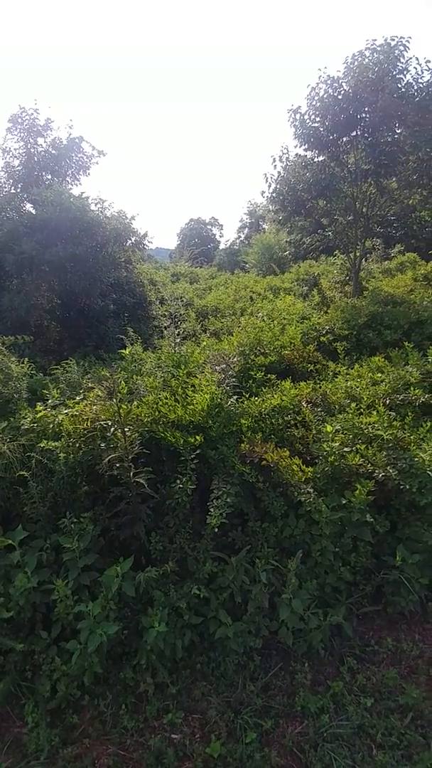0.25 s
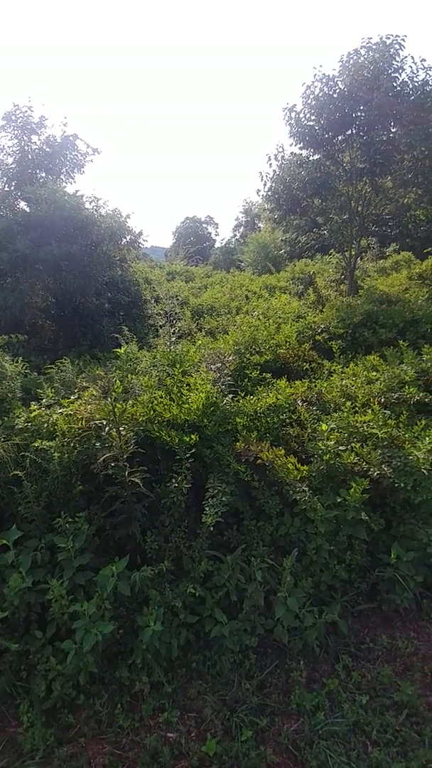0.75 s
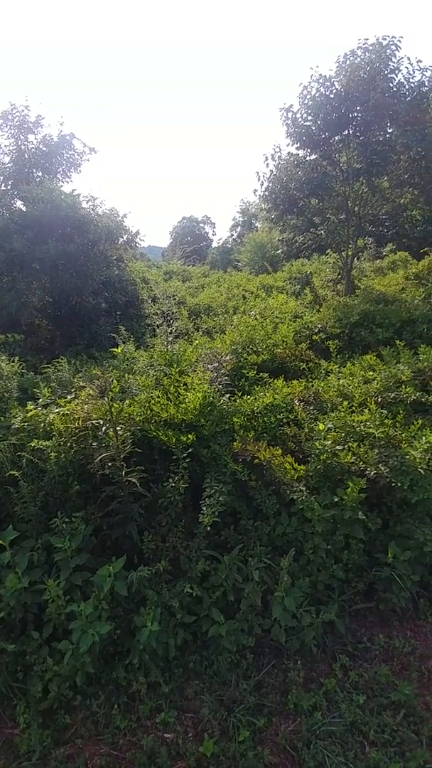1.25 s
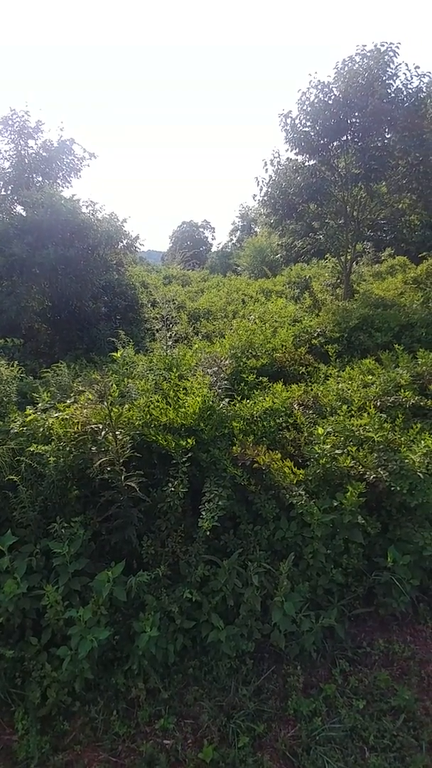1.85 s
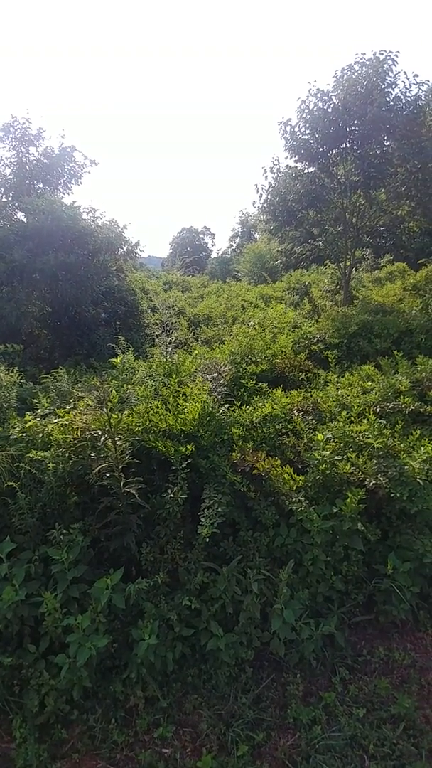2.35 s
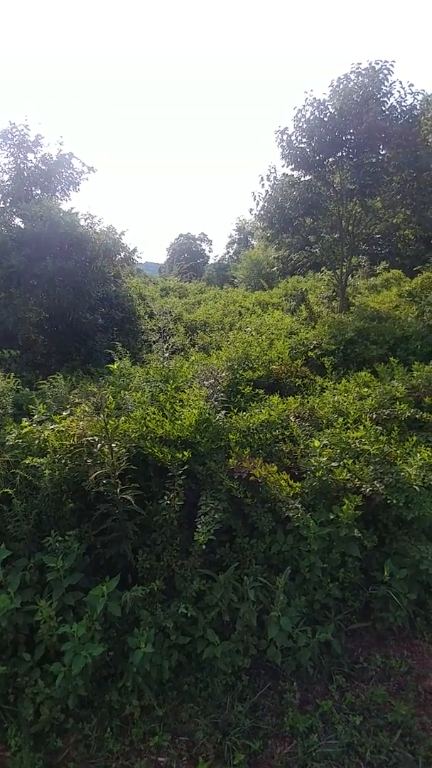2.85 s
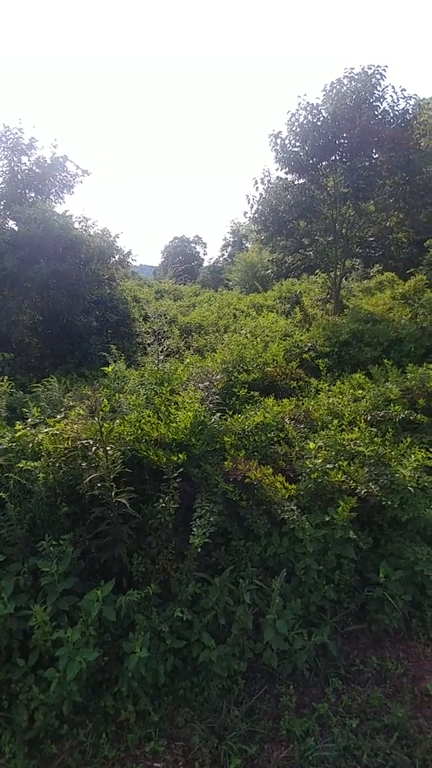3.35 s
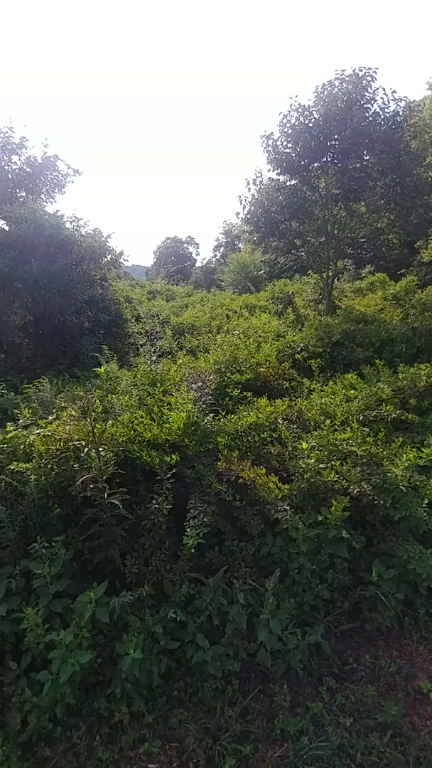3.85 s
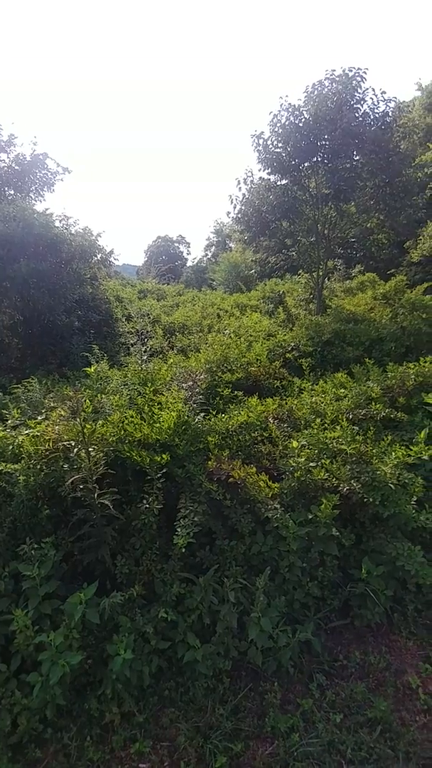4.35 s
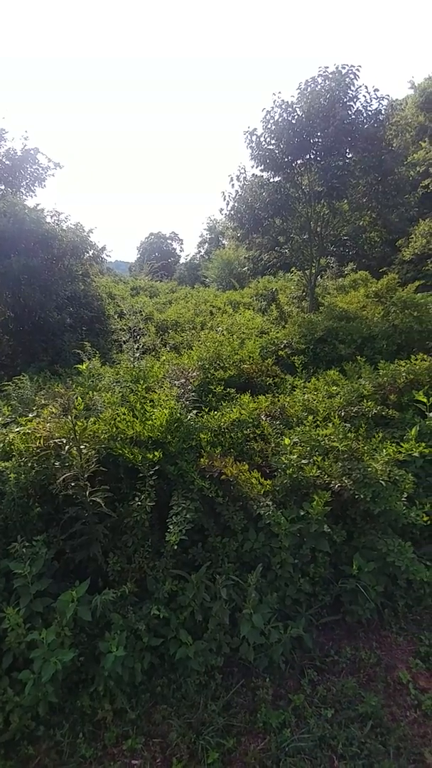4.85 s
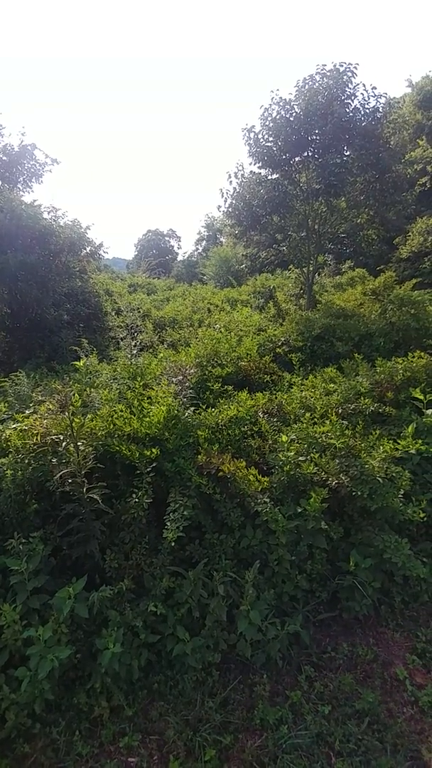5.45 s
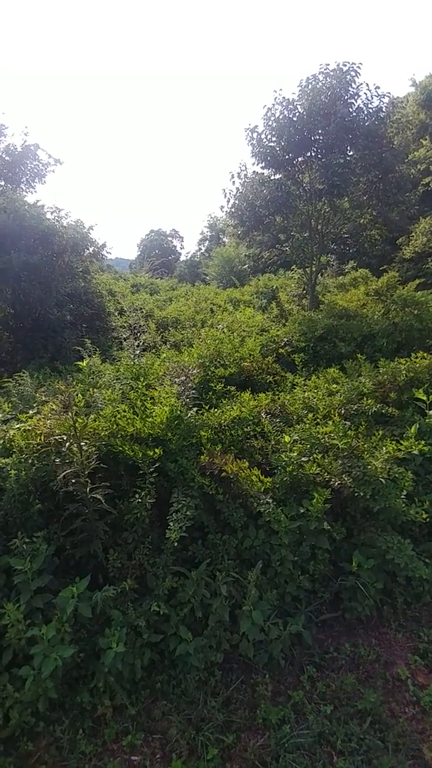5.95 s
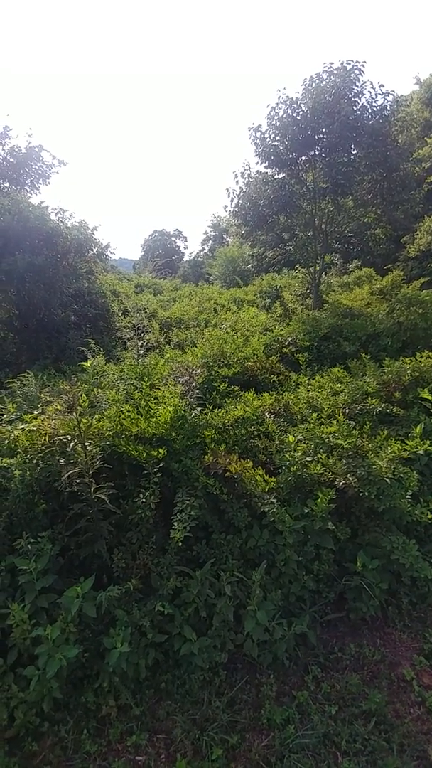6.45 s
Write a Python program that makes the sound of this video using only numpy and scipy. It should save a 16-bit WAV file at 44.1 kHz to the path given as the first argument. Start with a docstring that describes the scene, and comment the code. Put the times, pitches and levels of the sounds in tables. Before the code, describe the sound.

Three hounds bay in an overgrown field by trees, picked up by a handheld stereo phone. A rough yelp is already sounding at 0 s; from 0.3 to 1.3 the raspy, fuller low and higher voices overlap in cries of a tenth to a third of a second, starting high and dropping. More barks come from 1.5 to 2.4, including a strong low bawl at 1.75, then shorter yelps at 2.6 to 2.95. A sharp hoarse cry at 3.3 leads into a dense overlapping cluster from 3.7 to 4.7. A gap follows until 5.3, then weaker scattered yelps to 5.7 and final hoarse ones at 6.1 to 6.3. A thin, diffuse echo trails the cries. Throughout, cicadas drone high and steady with a fast slight throb, over faint cricket trills, leaf hiss and low rumble; soft katydid rasps recur roughly every 0.2 to 0.9 seconds. Thin bird whistles come at 6.35 and 6.5, the latter sliding up and falling.

```python
"""Thick brush before a tree line: three hounds bay as they run, by turns and overlapping, and a thin echo answers.
Each voice is a sum of overtones of the vocal folds, coloured by the throat and roughened by rasp and breath.
Cicadas drone (throbbing noise), crickets trill (pulsed tones), a katydid rasps (toothed noise) and a bird
whistles (gliding sines); far rumble, leaf hiss and a hum (noise bands) lie underneath.
A phone with two ports records; its noise suppressor lets the low band up while the voice band is loud."""
import sys
import numpy as np
from scipy import signal
from scipy.fft import rfft, irfft, next_fast_len
from scipy.io import wavfile
from scipy.ndimage import uniform_filter1d, map_coordinates

SR = 44100
rng = np.random.default_rng(int(sys.argv[2]) if len(sys.argv) > 2 else 0)


def output_pcm(signal):
    """Save a mono or channel-first signal as 16-bit PCM at the path in sys.argv[1].

    Samples are clipped to [-1, 1] before scaling.
    """
    pcm = np.clip(np.atleast_2d(signal).T, -1, 1) * 32767
    wavfile.write(sys.argv[1], SR, np.round(pcm).astype(np.int16))


N = 294588
T = np.arange(N) / SR  # time/s

# Calls of each dog: pitch swoops from its onset value, holds, then bends to its end value. Columns:
# start t/s, rise/s, swoop/s, length/s, onset f/Hz, held f/Hz, end f/Hz, level at the end of the rise/dB,
# held level/dB, end level/dB (the pitch line ahead of echo and ports), then relative to the pitch line:
# half-pitch lines level/dB, rasp level/dB, upper voice level/dB
DEEP_CALLS = [ (0.398, 0.0082, 0.022, 0.16, 563, 550, 565.6, -35.5, -49.5, -39, -21, -18.5, -9.5),
              (0.835, 0.023, .062, .33, 798, 567.3, 574, -25, -35, -52, -14, -16.5, -18.5),
              (1.297, 0.014, 0.027, 0.033, 781, 592, 570, -50.5, -46.5, -59, -15, -28, -26),
              (1.748, 0.025, .066, .222, 904, 601.6, 584, -25.5, -30, -33, -11, -22.5, -18.5),
              (3.352, 0.018, 0.067, 0.12, 545.4, 551.7, 590, -41.5, -44.5, -43, -28, -25.5, 0),
              (3.748, 0.013, .044, .2, 695, 586.7, 615, -26, -34, -33, -17, -25.5, -16),
              (4.215, 0.034, .09, 0.29, 829.5, 562, 580, -29, -38.5, -39.5, -15, -23, -16),
              (4.55, 0.01, .058, 0.098, 536, 594.3, 547, -44.5, -33, -38.5, -34, -12.5, -8), ]
ROUGH_CALLS = [ (-0.03, 0.023, .05, .19, 767, 796, 714, -32, -38.5, -38, -20, -8.5, -25.5),
               (0.318, 0.047, 0.13, .242, 890, 630.4, 705, -27, -30.5, -29, -38, -12.5, -26.5),
               (0.55, 0.019, 0.071, 0.2, 698.6, 643, 791, -37, -35, -32, -18, -12, -35.5),
               (1.045, 0.016, 0.046, .065, 1003, 700, 655, -31.5, -39, -50, -32.5, -0.5, -21),
               (1.535, 0.047, .065, .135, 995.6, 809, 835, -38, -41, -43, -25.5, 3, -13.5),
               (1.665, 0.0089, 0.021, 0.1, 769, 710, 697.3, -31.5, -33.5, -33.5, -26, -3.5, -38),
               (2.07, 0.05, .12, .16, 915, 711.6, 811, -35.5, -41.5, -40.5, -13, -2.5, -23.5),
               (2.225, 0.0067, 0.019, .125, 761.5, 700, 834, -37.5, -37.5, -38.5, -12, -3, -59),
               (2.73, 0.0067, 0.013, .035, 689, 652, 634, -39, -42, -47, -17, -2.5, -24.5),
               (2.84, 0.0099, 0.01, .022, 740, 688, 700, -35.5, -53.5, -59.5, -25, -3.5, -47),
               (3.16, 0.02, 0.061, .125, 802.6, 700, 739, -33, -47.5, -35.5, -21.5, 5.5, -32),
               (3.275, 0.013, .125, .2, 779, 665, 721, -21.5, -29.5, -40, -36, -10, -27),
               (3.845, 0.027, .125, .215, 1000, 679.3, 707.4, -29.5, -32, -38, -34, -1.5, -20),
               (4.07, 0.0072, 0.064, 0.076, 733, 821, 765, -35.5, -43, -38.5, -28, -4.5, -20.5),
               (4.532, 0.0095, .02, .088, 715.5, 723.4, 805, -35, -41.5, -45.5, -31, 2, -7),
               (5.298, 0.013, .025, .072, 1119, 1051, 748, -45, -42.5, -26, -25, -20.5, -16.5),
               (5.39, 0.034, 0.09, 0.14, 784, 790, 767, -53.5, -54, -67, -29.5, 2, -17.5),
               (5.628, .014, 0.031, 0.027, 864, 670, 640, -47.5, -59, -54, -24, -14, -19),
               (6.07, 0.017, 0.084, 0.171, 1004, 690, 696, -45, -42, -48, -12, 6, -18.5), ]
HIGH_CALLS = [ (0.46, .016, .062, 0.24, 836, 743, 750, -34.5, -32, -50, -18.5, -15, -27),
              (0.88, 0.031, .095, 0.17, 885, 712, 780, -36.5, -50, -43, -11.5, -6, -20),
              (1.09, .02, 0.059, .2, 740, 998.6, 1016, -55, -47, -48, -13, -14, -29),
              (1.97, 0.012, 0.097, 0.042, 1177, 670, 700, -56, -50, -51, -20, -17, -22),
              (2.195, 0.0043, 0.044, 0.13, 951, 1007, 1004, -44.5, -47, -53, -33, -19, -29),
              (2.62, 0.035, .033, 0.068, 834, 812, 840, -42.5, -56.5, -53, -0.5, -2.5, -14),
              (2.68, 0.008, 0.11, 0.087, 1130, 950, 930, -47.5, -38, -55, -12, -10, -25.5),
              (2.778, .034, .05, 0.17, 852.6, 997, 989, -33.5, -42, -56, -25.5, -14, -1),
              (3.708, 0.01, 0.053, 0.055, 1301, 1153, 1092, -42.5, -50, -44, -20.5, -0.5, 3.5),
              (4.15, 0.024, .085, .25, 1303, 913.4, 975, -37, -37, -34, 7.5, -13.5, -9.5),
              (4.398, 0.0083, 0.034, .075, 975.4, 985, 933, -37, -39.5, -39.5, 6.5, -10, -2.5),
              (4.475, 0.021, 0.056, 0.23, 975.3, 977, 992.6, -26.5, -35, -50.5, -2, -12.5, -8),
              (5.375, 0.0063, .075, 0.2, 1023, 1296, 1290, -38, -53, -60, -21, -10, -33),
              (5.575, 0.011, 0.0523, 0.051, 1386, 1258, 1240, -52.5, -54, -62.5, -30, -12, -10),
              (5.642, 0.013, 0.059, .075, 1350, 1216, 1245, -68, -73, -76, -19, -7.5, -15),
              (6.19, .02, 0.0675, 0.096, 905, 1055, 1095, -44, -46, -58, -11.5, -7, -41), ]
# Resonance of each dog's throat and mouth: f/Hz, relative level/dB
DEEP_TRACT = [(200, 2.5), (450, -17.5), (600, 5.5), (900, -9), (1200, -9), (1550, -9), (1900, -3.5),
              (2400, -4.5), (3200, -25.5), (4500, -53)]
ROUGH_TRACT = [(200, -27.5), (450, -4), (650, 0), (900, 1), (1400, -8.5), (1900, -14), (2300, -11.5),
               (3000, -12), (3700, -19.5), (4800, -53.5)]
HIGH_TRACT = [(200, -30), (450, -24.5), (700, 9.5), (1000, 7.5), (1400, -6), (1900, -10.5), (2400, 2.5),
              (3000, -10), (3600, -36), (4500, -58.5)]
# Difference in colour of the two ports: f/Hz, left minus right level/dB
PORT_COLOUR = [(200, -7), (400, -4), (600, 8), (780, -2), (1000, -4), (1400, 2), (2300, -6.5), (4400, -8.5)]
# Phase between the ports: f/Hz, lead of the left port/rad
PORT_LEAD = [(250, 0.76), (450, 1), (650, 0.18), (850, 0.31), (1150, 1.54), (1800, 1.72), (2250, 1.1),
             (3700, 3.36)]
# Echo off brush and trees: f/Hz, time to decay by 60 dB t/s, relative level/dB
TREE_ECHO = [(300, 0.56, -12), (580, 0.73, -15.5), (960, 0.62, -3.5), (1500, 0.77, -2.5),
             (2330, 0.72, -6.5), (5000, 0.16, -8.5)]
# Main band of the cicada drone: f/Hz, relative level per Hz/dB
CICADA_BAND = [(3060, -50.5), (5200, -36.5), (5410, -29.5), (5780, -9), (6120, 3.5), (6460, 7),
               (6880, -2.5), (7890, -22.5), (9510, -35.5), (10300, -61.5), (13400, -85.5), (22000, -120)]
# Overtone band of the drone: f/Hz, relative level per Hz/dB
CICADA_OVERTONE = [(6350, -47), (10800, -22), (11600, 7.5), (13800, 15), (14700, -7.5), (15100, -19.5),
                   (15500, -17.5)]
# Rumble, leaves and far insects: f/Hz, relative level per Hz/dB
AIR_BAND = [(15, -37), (25, -37), (59, 1), (141, -15), (259, -18), (332, -19), (476, -21), (1680, -28.5),
            (1880, -31), (2630, -31), (3850, -23.5), (5400, -20.5), (7020, -50), (11900, -120)]
# Left-right correlation of the air: f/Hz, likeness (0 to 1)
AIR_LIKENESS = [(60, 0.78), (150, 0.73), (300, .3), (1500, 0.35), (3000, 0.017)]
# Swelling and fading of the far hum: t/s, rms level/dB
HUM_LEVEL = [(0, -69.5), (1.2, -67), (2, -58.5), (2.8, -70), (4, -65), (5.2, -68), (6.68, -75.5)]
# Colour of the hum: f/Hz, relative level per Hz/dB
HUM_COLOUR = [(60, -60.5), (90, -2.5), (105, 2), (125, -8.5), (180, -60.5)]
# Katydid rasps: start t/s, nominal level/dB ahead of ramps and panning, length t/s
KATYDID_RASPS = [(0.214, -47.5, 0.13), (1.337, -48, 0.13), (1.522, -53, 0.12), (2.088, -47, 0.14),
                 (2.925, -47, 0.14), (3.621, -48, 0.17), (4.479, -52, 0.16), (5.1755, -51, 0.16),
                 (5.9245, -52, 0.18)]
# Resonance of the katydid's wing: f/Hz, relative level per Hz/dB
WING_BAND = [(7000, -20), (7600, 2.5), (8300, 0), (9300, -5), (9800, -24), (10100, -58.5)]
# One list per whistle of the bird: t/s, f/Hz, rms level/dB ahead of panning
BIRD_WHISTLES = [
    [(6.34, 5700, -70), (6.36, 5900, -49), (6.38, 5450, -60)],
    [(6.485, 3780, -78), (6.499, 3320, -62.5), (6.569, 4480, -47), (6.588, 3720, -51.5),
     (6.63, 3010, -66.5), (6.68, 2920, -74.5)],
]

ONSET_DB = 21  # a call starts this far under its level at the end of the rise
SWOOP_RASP_DB, SWOOP_HALF_DB = 12, 9.5  # taut folds: less rasp, weaker half-pitch lines at the onset
SWOOP_EVEN = 0.85  # share of the fold shake that taut folds lose
UPPER_STEADY = 0.29  # share of a level drop that the upper voice does not follow
END_BEND = 2.143  # power that makes the end bend come late
TOP_HZ = 15628  # upper band limit of the recorder


def amp(db):
    """Decibel law: level to amplitude ratio."""
    return 10 ** (np.asarray(db) / 20)


def unit(x):
    """Normalisation to an rms value of 1."""
    return x / np.sqrt(np.mean(x ** 2) + 1e-20)


def along(points, hz):
    """Linear interpolation of (f/Hz, value) points on a logarithmic frequency axis."""
    f, v = np.transpose(points)
    return np.interp(np.log(hz + 1), np.log(f + 1), v)


def wobble(rate):
    """Band-limited randomness: a smooth curve of rms 1 through rate random knots a second."""
    knots = rng.standard_normal(int(N * rate / SR) + 4)
    return unit(map_coordinates(knots, [T * rate]))


def filtered(x, response):
    """Linear filtering: the spectrum of x times a complex response of frequency."""
    m = next_fast_len(N + SR // 2)
    return irfft(rfft(x, m) * response(np.fft.rfftfreq(m, 1 / SR)), m)[..., :N]


def hiss(spectrum, channels=2):
    """Spectral shaping of white noise: unrelated channels, together of rms 1."""
    white = rng.standard_normal((channels, N))
    return unit(filtered(white, lambda hz: amp(along(spectrum, hz))))


def call_shape(call, t, ease, open_db):
    """Fold tension sets the pitch: tracks of pitch, levels and tension at times t/s after the start."""
    (rise, swoop, length, onset_hz, held_hz, end_hz,
     risen_db, held_db, end_db, half_db, rasp_db, upper_db) = call
    swoop = max(swoop, rise + .001)
    length = max(length, swoop + .001)
    taut = np.clip(1 - t / swoop, 0, 1)
    late = np.clip((t - swoop) / (length - swoop), 0, 1)
    hz = held_hz + (onset_hz - held_hz) * taut ** ease + (end_hz - held_hz) * late ** END_BEND
    db = np.interp(t, [0, rise, swoop, length], [risen_db - ONSET_DB, risen_db, held_db, end_db])
    drop_db = max(risen_db, held_db, end_db) - db
    mouth_db = upper_db + UPPER_STEADY * drop_db + open_db * taut
    return hz, db, half_db - SWOOP_HALF_DB * taut, rasp_db - SWOOP_RASP_DB * taut, mouth_db, taut


def dog(calls, throat, ease, open_db, jitter, blur, flutter_hz, breath_db, hoarse_db, edge=.012):
    """Source and filter: fold overtones through the throat; rasp smears the lines and adds breath noise.

    ease: power of slowing into the held pitch; open_db: upper voice added by the wide-open mouth at onset.
    """
    out = np.zeros(N)
    tremble = wobble(45) + .8 * wobble(11)
    flutter, uneven, brush = wobble(flutter_hz), wobble(90), wobble(30)
    breath = hiss(throat, channels=1)[0]

    def upper(hz):  # what an open mouth lets out
        return 1 / (1 + (1250 / (hz + 1)) ** 10)

    bright_breath = filtered(breath, upper)
    order = np.arange(1, 17)[:, None]  # in steps of half the pitch: 2 is the pitch line
    high = order > 2
    for start, *call in calls:
        length = call[2]
        span = slice(max(round((start - edge) * SR), 0), round((start + length + edge) * SR))
        t = T[span] - start
        hz, db, half_db, rasp_db, mouth_db, taut = call_shape(call, t, ease, open_db)
        half_phase = np.pi * np.cumsum(hz * (1 + jitter * tremble[span])) / SR
        line_hz = order * hz / 2
        # every second fold closure is weaker: odd multiples of half the pitch
        line_db = along(throat, line_hz) - along(throat, hz) + order % 2 * half_db
        line_db = line_db + mouth_db * upper(line_hz) * high
        # uneven closures shake the high lines more than the low ones
        steadiness = 1 - SWOOP_EVEN * np.sqrt(taut)
        shake = blur * amp(rasp_db / 4) * np.maximum(order - 2, 0) * uneven[span] * steadiness
        # brush in the path breaks each high line up at its own moments
        moments = (np.arange(span.start, span.start + len(t)) + order * (N // 17)) % N
        line_db = line_db + 7 * high * np.minimum(brush[moments], .3)
        voice = np.sqrt(2) * np.sum(amp(line_db) * np.sin(order * half_phase + shake), axis=0)
        puffs = 1 + .5 * np.cos(2 * half_phase)  # breath pulses once a pitch period
        dull_breath = (breath - bright_breath)[span]
        rasp = flutter[span] * voice + amp(breath_db) * puffs * dull_breath
        # the upper voice is always hoarse, and more so with rasp
        hoarse = amp(mouth_db + hoarse_db + rasp_db / 4) * puffs * bright_breath[span]
        fade = np.clip(np.minimum(t, length - t) / edge + 1, 0, 1) ** 2
        out[span] += fade * amp(db) * (voice + amp(rasp_db) * rasp + hoarse)
    return out


def trees(x):
    """Diffuse scattering: convolution with two noise tails, each frequency dying at its own speed."""
    hz, t, z = signal.stft(rng.standard_normal((2, SR * 3 // 4)), SR, nperseg=256)
    t60, db = [along([(row[0], row[k]) for row in TREE_ECHO], hz)[:, None] for k in (1, 2)]
    # a longer decay spreads the same energy over more time
    spread = np.sqrt(t60 * SR / np.log(1e6))
    tail = signal.istft(z * amp(db - 60 * t / t60) / spread, SR, nperseg=256)[1]
    delayed = np.pad(x, (500, 0))  # in samples
    return signal.fftconvolve(delayed[None], tail, axes=1)[:, :N]


def pack():
    """Two-point reception: the ports differ in colour and phase; the voices have little below 230 Hz."""
    dogs = dog(DEEP_CALLS, DEEP_TRACT, ease=1.05, open_db=-3, jitter=.006, blur=.7,
               flutter_hz=160, breath_db=-1.5, hoarse_db=0)
    dogs = dogs + dog(ROUGH_CALLS, ROUGH_TRACT, ease=1.6, open_db=12.6, jitter=.008, blur=.7,
                      flutter_hz=240, breath_db=-6, hoarse_db=1)
    dogs = dogs + dog(HIGH_CALLS, HIGH_TRACT, ease=1.5, open_db=-10.5, jitter=.006, blur=.3,
                      flutter_hz=160, breath_db=2, hoarse_db=-3)
    side = np.array([[.5], [-.5]])

    def ports(hz):
        colour = amp(side * along(PORT_COLOUR, hz))
        lead = np.exp(1j * side * along(PORT_LEAD, hz))
        low_cut = 1 + (230 / (hz + 1)) ** 6
        return colour * lead / low_cut

    echo = trees(dogs)
    return filtered(dogs + .5 * echo.sum(axis=0) + 0.65 * echo, ports)


def cicadas():
    """Amplitude modulation: a chorus noise throbs weakly at the rate of the nearest singer."""
    turns = 35.4 * T  # throbs since the start
    throb = 1 + 0.12 * np.cos(2 * np.pi * turns) + 0.053 * np.cos(4 * np.pi * turns)
    swell = amp(0.4 * wobble(1.3) + 0.63 * np.array([wobble(13), wobble(13.0)]))
    drone = amp(-43.5) * hiss(CICADA_BAND) + amp(-74.5) * hiss(CICADA_OVERTONE)
    return throb * swell * drone * amp([[.6], [-.6]])


def crickets():
    """Driven resonance: in each of two trills, wing strokes ring one short mode."""
    out = 0
    for stroke_hz, hz, db in [(65.5, 4680, -64.5), (53, 4596, -65)]:
        stroke = np.cumsum(stroke_hz * (1 + 0.025 * wobble(3.3))) / SR
        pulse = np.maximum(np.sin(2 * np.pi * stroke) - .1, 0)
        tone = np.sin(2 * np.pi * hz * T + 1.35 * np.array([wobble(90), wobble(90)]))
        out = out + amp(db + 0.32 * wobble(7)) * unit(pulse * tone)
    return out


def air():
    """Partial coherence: rumble in lumps, near mono, under a steady faint hiss of leaves."""
    def turn(hz):  # the mid-side angle that yields the wanted correlation
        return np.arccos(np.clip(along(AIR_LIKENESS, hz), -1, 1)) / 2

    mid, side = filtered(hiss(AIR_BAND), lambda hz: np.array([np.cos(turn(hz)), np.sin(turn(hz))]))
    bed = amp(-56) * unit(np.array([mid + side, mid - side]))
    rumble = filtered(bed, lambda hz: 1 / (1 + (hz / 220) ** 4))
    lumps = amp(1.5 * wobble(4.5) + 2.5 * wobble(12))
    return bed - rumble + lumps * rumble


def hum():
    """Narrow-band noise: a low far hum, the same at both ports."""
    s, db = np.transpose(HUM_LEVEL)
    return amp(np.interp(T, s, db)) * hiss(HUM_COLOUR, channels=1)


def katydid():
    """Stridulation: short rasps of a wing file, 85 teeth a second."""
    level = np.zeros(N)
    for s, db, length in KATYDID_RASPS:
        level += amp(db) * np.clip(np.minimum(T - s, s + length - T) / 0.091, 0, 1)  # ramps/s
    teeth = 1 + 0.27 * np.cos(2 * np.pi * 85 * T)
    wing = hiss(WING_BAND, channels=3)
    # a little noise common to both sides
    return level * teeth * unit(0.09 * wing[2] + wing[:2]) * amp([[1.5], [-1.5]])


def bird():
    """Frequency gliding of a pure tone: two thin whistles, the second dipping, sliding up and falling."""
    whistle = np.zeros(N)
    for note in BIRD_WHISTLES:
        s, hz, db = np.transpose(note)
        level = amp(np.interp(T, s, db, left=-120, right=-120))
        phase = 2 * np.pi * np.cumsum(np.interp(T, s, hz)) / SR
        whistle += np.sqrt(2) * level * np.sin(phase)
    return whistle * amp([[-1.1], [1.1]]) + amp(-4.0) * trees(whistle)


def scene():
    """Superposition of all sources at the two ports."""
    return pack() + cicadas() + crickets() + air() + hum() + katydid() + bird()


def record(dry):
    """Level-dependent gain: the low band is turned down unless the voice band is loud; then a band limit."""
    voice = filtered(dry.mean(axis=0), lambda hz: (hz > 500) & (hz < 1500))
    loud_db = 10 * np.log10(np.abs(uniform_filter1d(voice ** 2, size=2600)) + 1e-12)
    closed = 1 / (1.5 + np.exp((loud_db + 49) / 4))  # 0 when loud, 1/1.5 in quiet
    low = filtered(dry, lambda hz: 1 / (1 + (hz / 2800) ** 4))
    return filtered(dry - low + amp(-13 * closed) * low, lambda hz: hz < TOP_HZ)


dry = scene()
out = record(dry)
output_pcm(out)
```